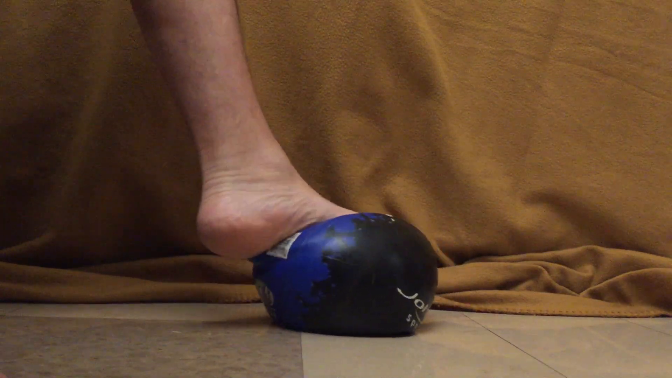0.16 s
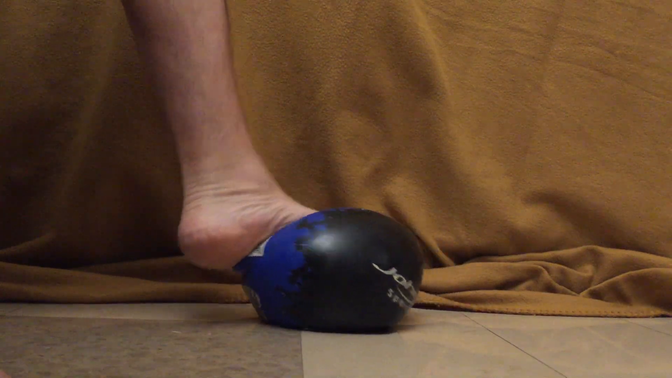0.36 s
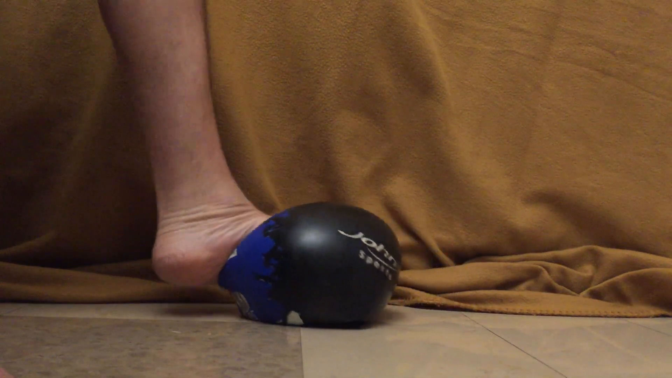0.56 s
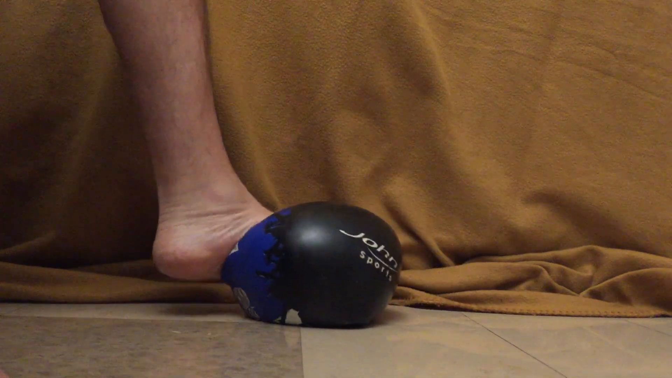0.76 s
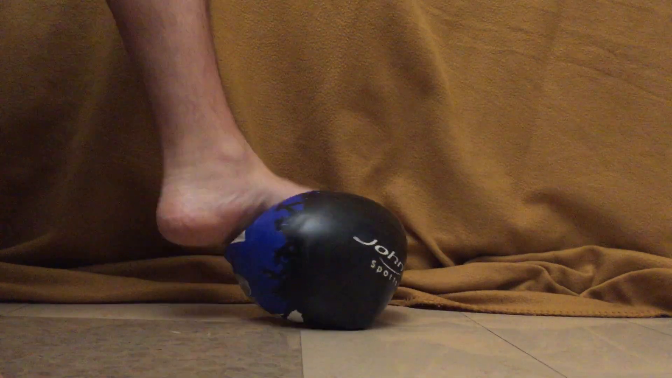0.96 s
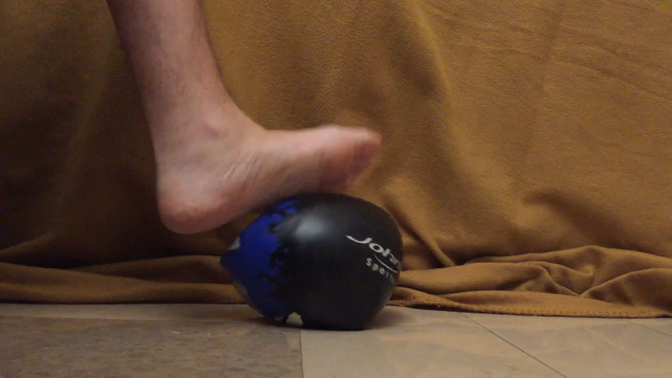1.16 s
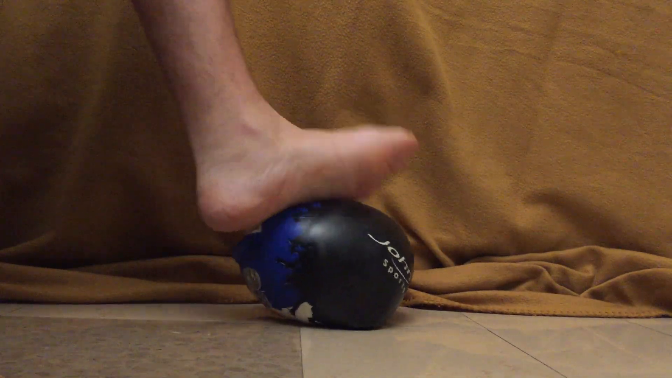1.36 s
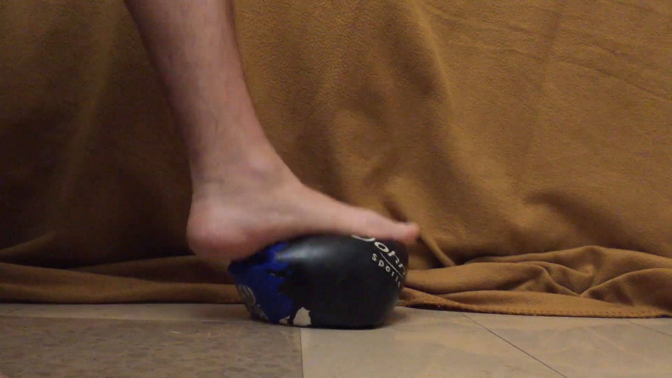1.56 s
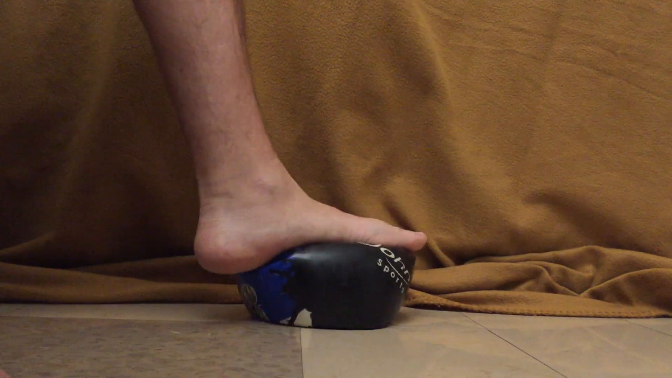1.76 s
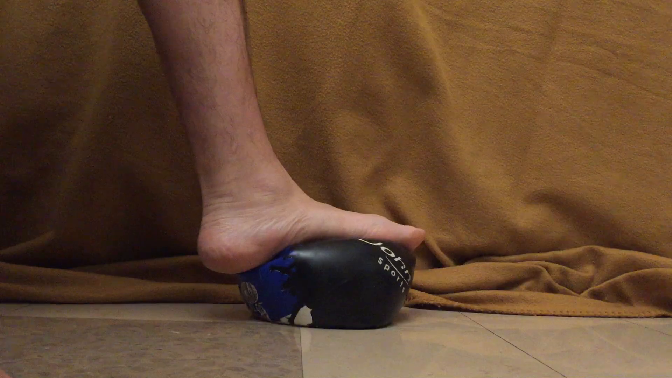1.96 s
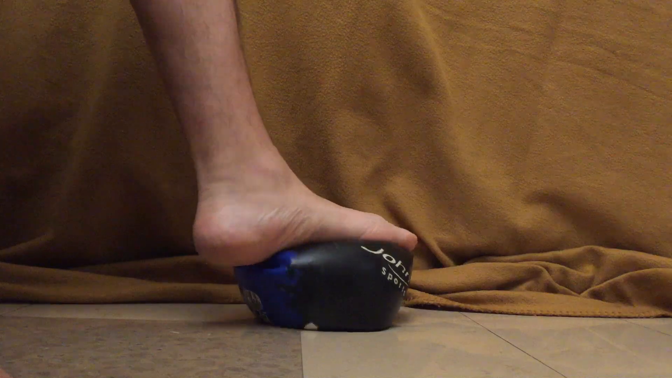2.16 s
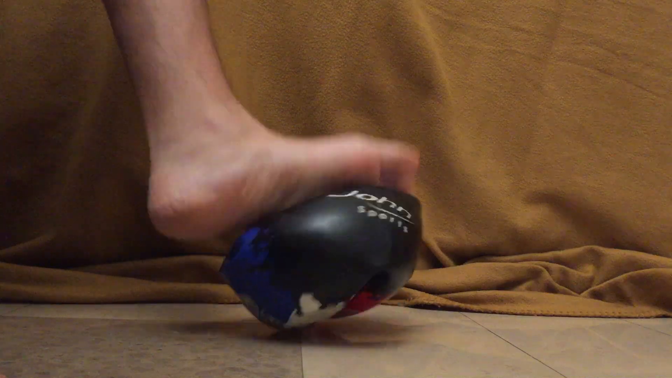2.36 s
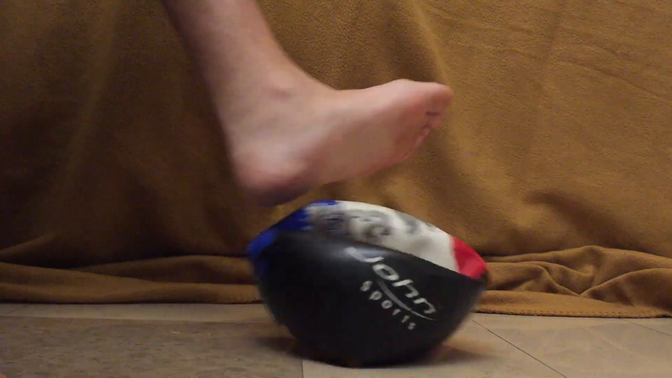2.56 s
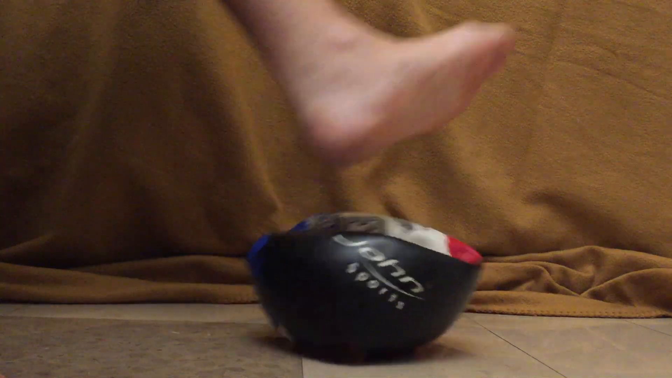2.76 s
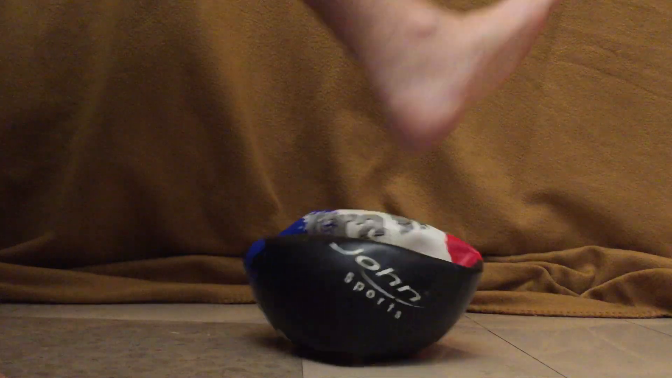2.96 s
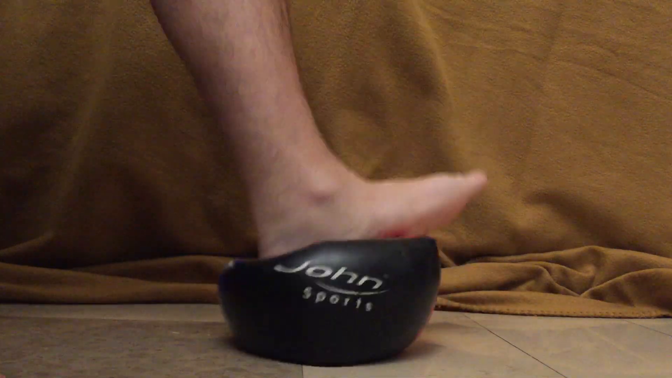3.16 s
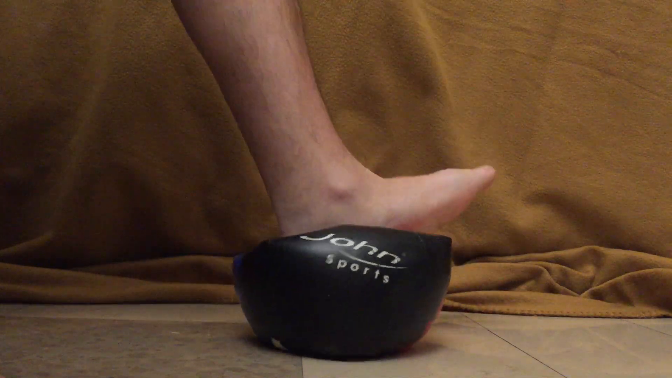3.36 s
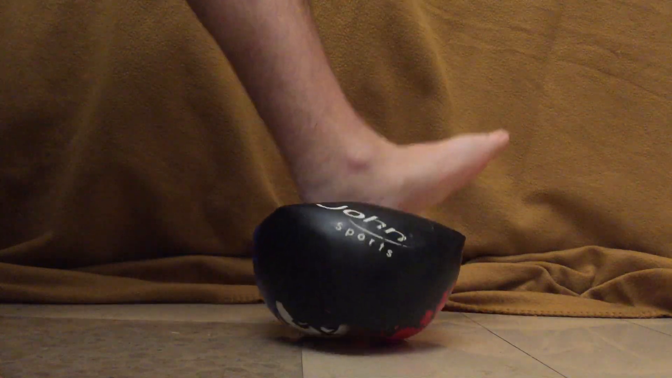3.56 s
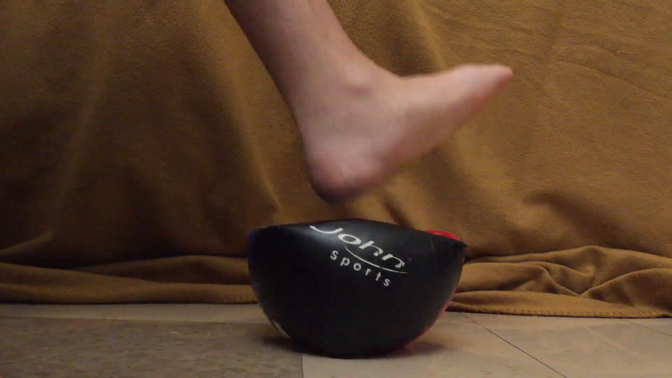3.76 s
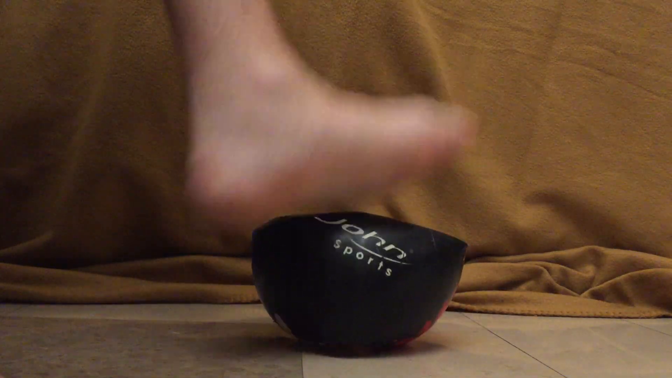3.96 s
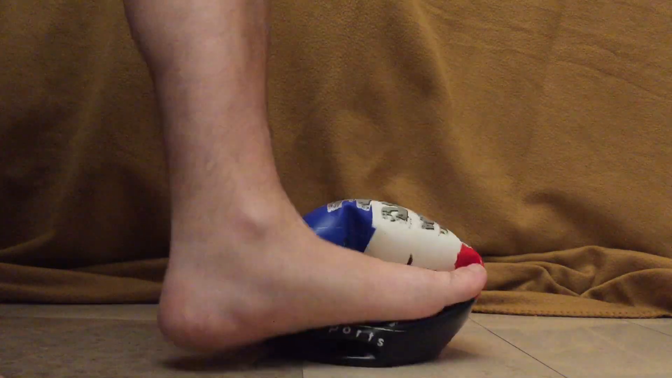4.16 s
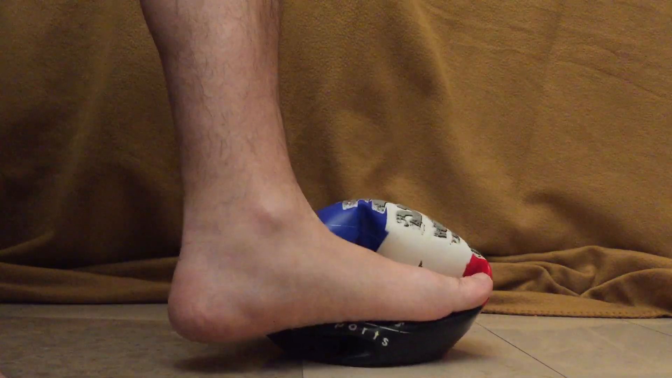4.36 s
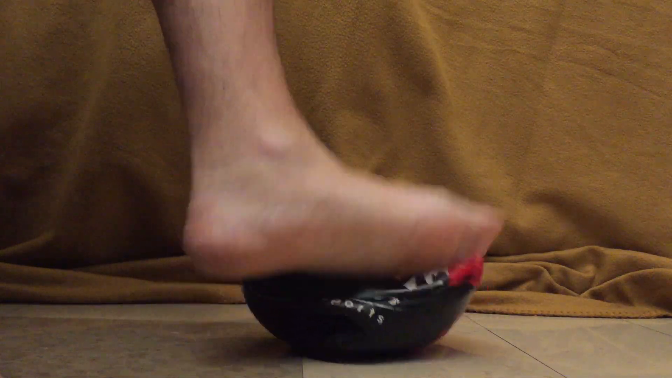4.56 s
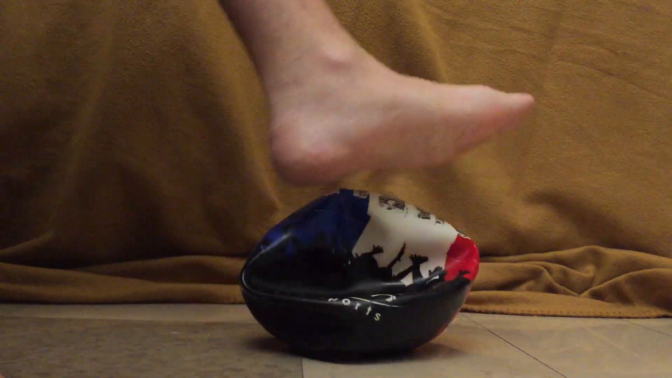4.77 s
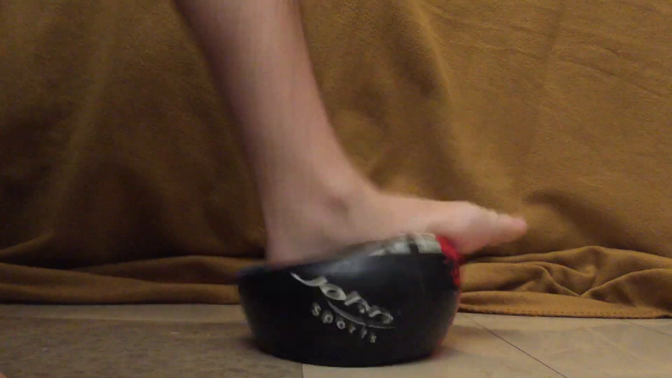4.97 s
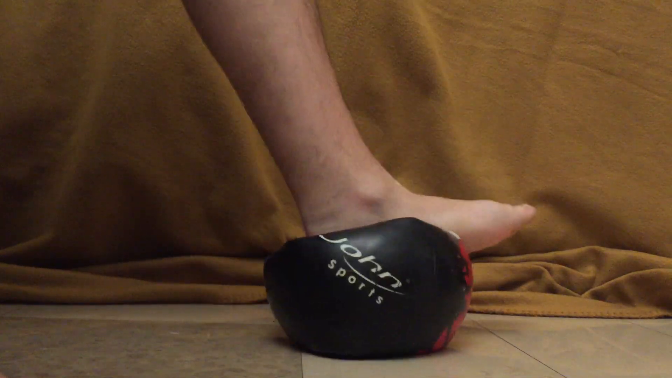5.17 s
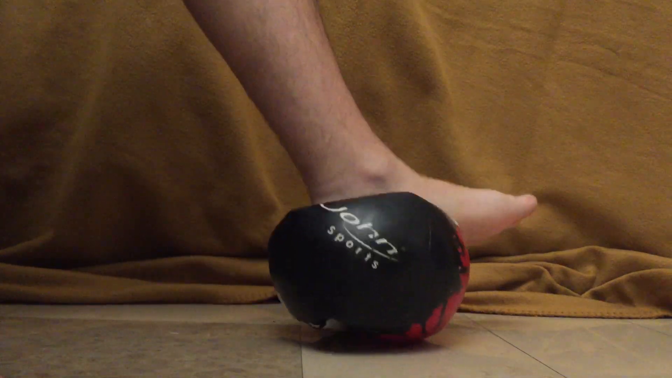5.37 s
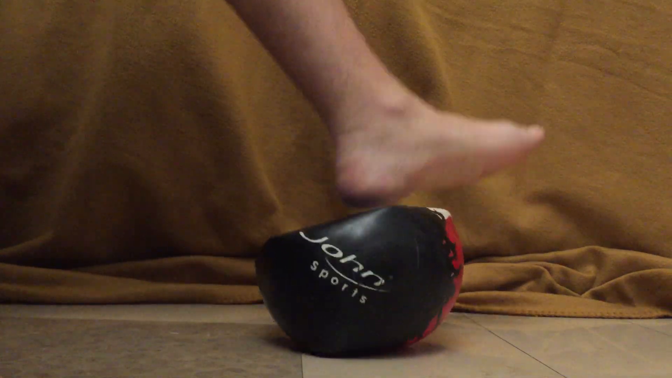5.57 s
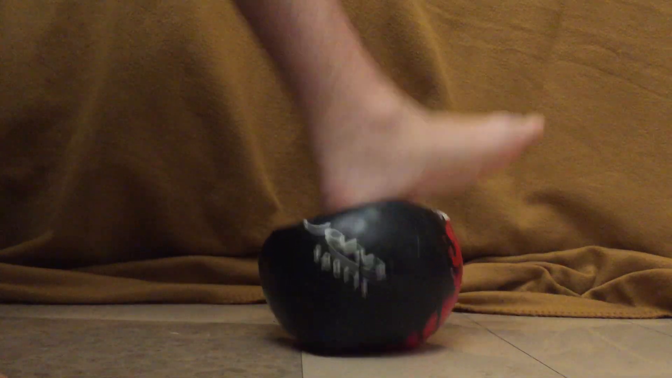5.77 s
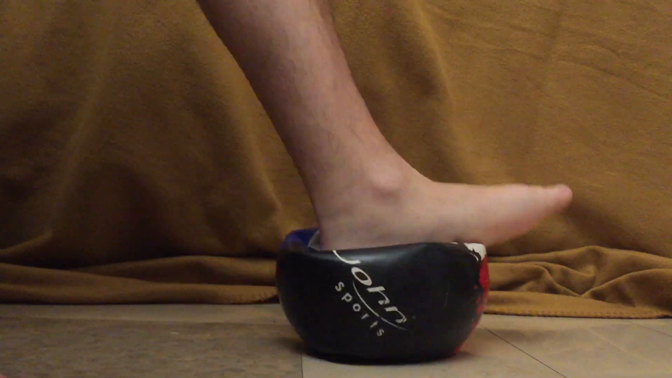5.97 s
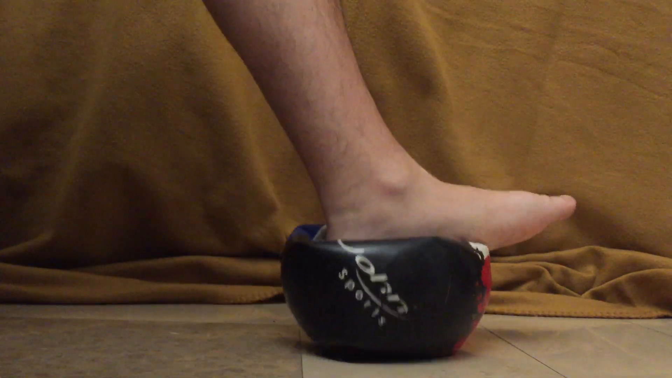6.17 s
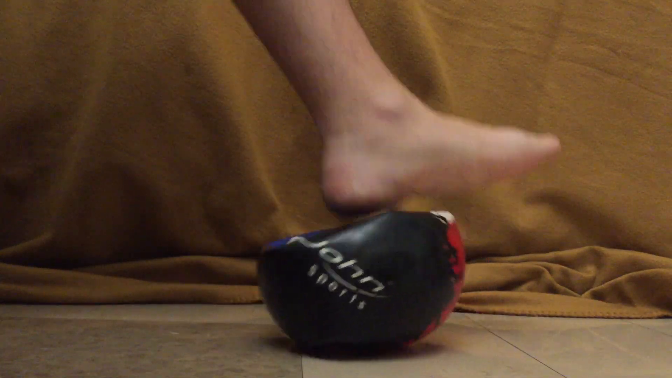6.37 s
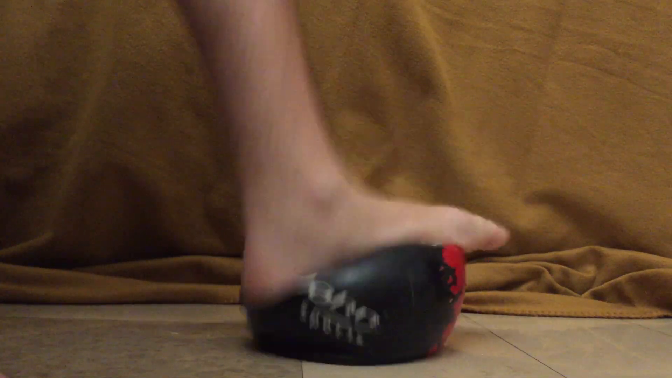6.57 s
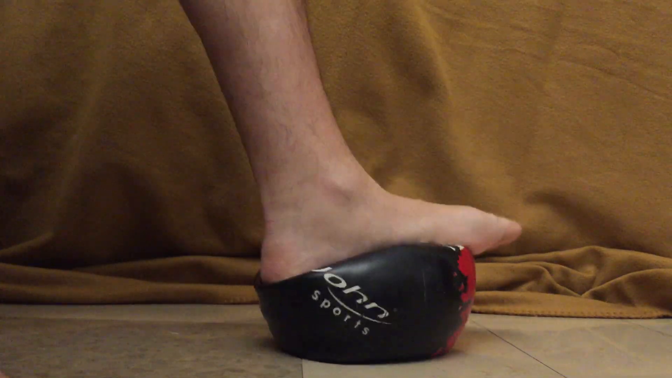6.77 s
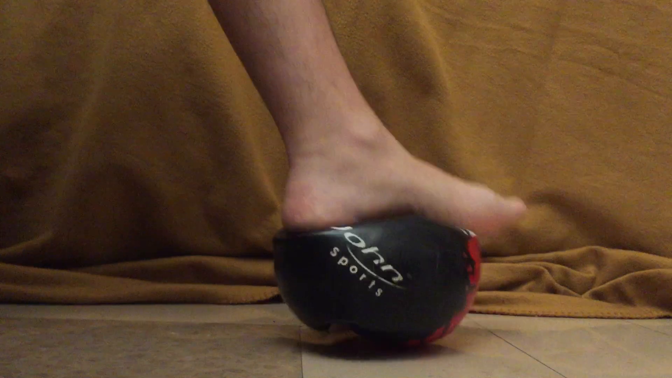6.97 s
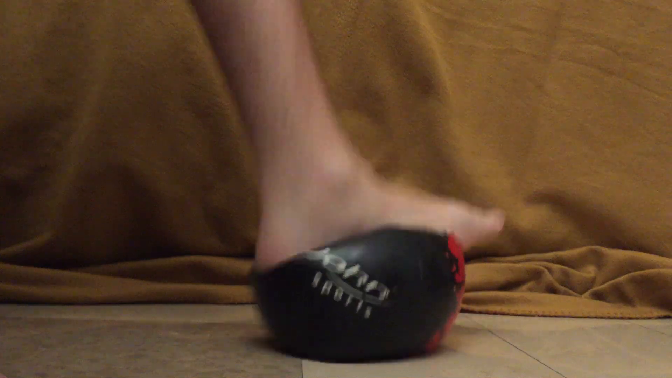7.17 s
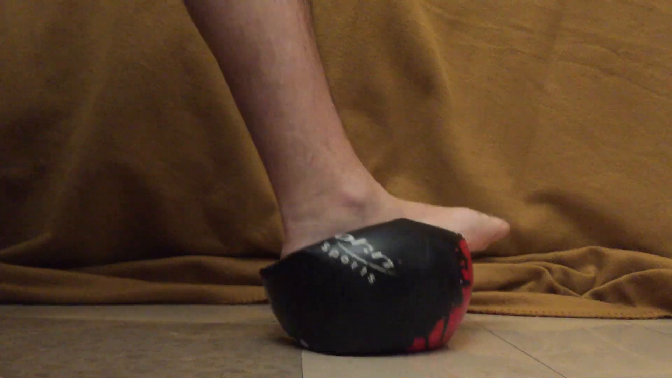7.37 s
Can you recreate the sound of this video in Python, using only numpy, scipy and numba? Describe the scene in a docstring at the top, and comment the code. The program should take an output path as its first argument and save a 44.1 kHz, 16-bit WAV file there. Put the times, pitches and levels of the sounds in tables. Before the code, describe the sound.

Close up in a small, faintly humming room, a bare foot presses a half-empty plastic ball on tiles. Faint rubbing and tiny ticks come first, then a muffled burst of low thumps. Louder hollow knocks and a clattering crumple follow, then a sudden, dominating double crack with a pop and a puff of air. Afterwards come short rustling strokes and moderate buckling clicks.

```python
"""Cracks, knocks and thumps of a soft, half-empty plastic ball squashed by a bare foot on tiles, close by.
Each shell buckle is a filtered noise tick plus damped modes of the snapping patch and of the whole wall.
One large dent pops through as a pressure pulse; deep thuds are low damped modes with a noise rumble.
Skin slides and hisses as coloured noise; air rushes from folds as noise bands with sinking centres.
A small humming room answers: echoes, a noise-built reverberation, low rumble and wavering hum tones."""
import sys
import numpy as np
from scipy import signal
from scipy.fft import rfft, irfft, next_fast_len
from scipy.io import wavfile
from scipy.ndimage import uniform_filter1d
from numba import njit

SR = 44100
rng = np.random.default_rng(int(sys.argv[2]) if len(sys.argv) > 2 else 0)


def store_wav(level_fs):
    """Save 16-bit WAV to argv[1]."""
    pcm = np.round(np.clip(np.atleast_2d(level_fs), -1, 1) * 32767)
    wavfile.write(sys.argv[1], SR, pcm.T.astype(np.int16))


N = 326781
TIME = np.arange(N) / SR

# clear shell buckles: start_s, thump_db, thump_hz, knock_db, knock_hz, crack_db, crumple_length_s
BUCKLES = [(0.06, -38, 293, -43, 1330, -55, 0), (0.067, -39, 324, -32, 1150, -46, .01),
           (0.56, -43, 286, -41, 1430, -62, .03), (0.6746, -33, 139, -33, 1270, -58.5, 0),
           (0.771, -35, 204, -38, 1520, -58, 0), (0.78, -27, 133, -38.5, 1630, -57, 0),
           (1.101, -35, 175, -52, 1030, -62, .02), (1.6438, -32, 179, -39, 1780, -58, 0),
           (1.688, -24.5, 190, -41, 1120, -60, 0), (1.718, -24.5, 108, -52, 1100, -50, 0),
           (1.736, -24, 108, -54, 1480, -51, .012), (1.771, -26.5, 159, -29, 1130, -60, 0),
           (1.779, -29.5, 185, -29, 930, -49, .045), (1.997, -36, 142, -40, 1380, -49, .024),
           (2.152, -50, 170, -44, 2200, -54, .01), (2.3952, -41, 149, -42, 1980, -49, 0),
           (2.445, -34, 185, -41, 1360, -66, .018), (2.5806, -38, 154, -37.5, 1730, -45.5, .012),
           (2.6618, -39, 182, -44, 1720, -57, 0), (2.7125, -59, 173, -40.5, 1420, -51, 0),
           (2.9112, -43, 180, -46, 1690, -56, 0), (3.1896, -36.5, 135, -31.5, 1170, -40, .02),
           (3.239, -19.5, 175, -22.5, 1480, -44, 0), (3.2545, -24, 360, -24, 620, -55, 0),
           (3.2555, -12, 152, -11, 1400, -29, 0), (3.306, -42, 179, -27.5, 1260, -39.5, .028),
           (3.4983, -23, 150, -28, 1190, -66, 0), (3.563, -29.5, 132, -31, 1220, -60, .02),
           (4.124, -27.5, 162, -27, 1200, -34.5, .014), (4.154, -21, 174.5, -23, 1594, -34, .018),
           (4.1885, -20, 234.7, -16.5, 1150, -46, .008), (4.1974, -12.5, 195.9, -8, 950, -57, 0),
           (4.211, -20.5, 226, -40, 1290, -30.5, 0), (4.219, -13.5, 109.4, -20, 1180, -42, 0),
           (4.2291, -17, 120.2, -21, 1500, -32, 0), (4.254, -33, 110.3, -24.5, 1370, -55, 0),
           (4.546, -39.5, 130, -37.5, 1600, -52.5, 0), (4.6011, -33.5, 156.6, -35.5, 1700, -52.5, .014),
           (4.6358, -34.5, 124, -32.5, 1900, -47.5, 0), (5.0839, -12.5, 158.4, 0.5, 1670, -25, 0),
           (5.1212, -5.5, 160.2, 3.5, 1400, -10.5, 0), (5.952, -38, 183, -47, 1403, -32, .008),
           (5.959, -18, 158, -36, 1400, -46, 0.0016), (5.9653, -21.5, 200, -18, 1170, -29, .008),
           (6.006, -22.5, 277, -42, 1400, -32, .012), (6.6729, -24, 124, -20.5, 1590, -32, .012),
           (6.699, -23, 172, -45, 1060, -51, 0), (6.743, -24, 181, -29.5, 1033, -36.5, .024),
           (6.993, -33.5, 201, -36, 1620, -51, 0), (7.1497, -43.5, 160, -43.5, 1440, -59, 0),
           (7.26, -48, 182, -32, 1120, -65, 0), (7.275, -42, 184, -32, 1430, -45.5, 0),
           (7.299, -27, 139, -24.5, 1350, -48, .012), (7.3144, -17, 135, -25.5, 1450, -39, .008),
           (7.3305, -27, 210, -27, 1690, -49, .02)]
# modes of the whole wall: multiple of thump_hz, level_db, t60_s
WALL_MODES = [(0.619, -9.5, 0.055), (1.002, 2, 0.037), (1.502, -13, 0.039), (2.3, -12, .022),
              (3.601, -9.5, 0.0086), (4.6, -19.5, 0.019)]
# modes of the snapping patch: multiple of knock_hz, level_db, t60_s
PATCH_MODES = [(.45, -10.5, 0.011), (0.838, -11, 0.013), (1.029, -1, 0.012), (1.201, -19, 0.022),
               (1.7, -15.5, .008), (2.5, -14.5, 0.0087)]
# weaker snaps that follow a buckle
CRUMPLE_GAP_S, CRUMPLE_DB, CRUMPLE_FADE_DB_PER_S = .006, -4.5, 125
# small creases under the sole: rate at a full push; ten times rarer per CREASE_THINNING_DB drop in rub
CREASES_PER_S, FULL_PUSH_DB, CREASE_THINNING_DB = 45, -45, 29
# crease levels relative to the rub level; median pitches, pitch spread as a log ratio
CREASE_THUMP_DB, CREASE_KNOCK_DB, CREASE_CRACK_DB, CREASE_SPREAD_DB = 12, 6, -5, 2.5
CREASE_THUMP_HZ, CREASE_KNOCK_HZ, CREASE_PITCH_SPREAD = 178.3, 1402, .2
THUMP_LAG_S = .0005  # the wall starts to move just after the patch flips
# large dent popping through, one row: start_s, level_db, pulse_time_constant_s
POP = (5.1215, 6.6, 0.00027)
# foot or ball landing on the floor, and the low wall boom of the big pop: start_s, level_db, pitch_hz, t60_s
THUDS = [(4.224, -24, 69, 0.19), (4.239, -29.5, 96, 0.38), (5.1223, -13, 99.8, 0.055),
         (6.741, -31, 89.2, 0.14)]
# hollow ball and the air inside: pitch_hz, width_hz, level_db
CAVITY_MODES = [(100, 14, -6), (195, 22, -10), (586, 45, -1), (1700, 350, -9)]
# sole strokes, levels before the trims in sliding():
# start_s, swell_s, hold_s, fade_s, rub_db, hiss_db, hiss_centre_hz
STROKES = [(0, 0.0043, .14, 0.19, -65.5, -59, 10000), (0.24, 0.32, .22, 0.2, -59.5, -67, 10600),
           (0.843, 0.098, 0.58, 0.23, -70, -86, 9910), (1.57, .2, 0.058, 0.11, -53.5, -66, 11850),
           (1.71, 0.25, .2, .36, -61, -62, 11520), (1.96, .035, .025, .06, -54, -78, 11600),
           (2.22, .17, .01, 0.17, -60, -76, 9900), (2.4, .035, .015, .05, -56, -88, 10000),
           (2.55, 0.016, .12, 0.19, -58, -86.5, 9500), (3.165, 0.076, 0.064, 0.091, -48.5, -58.5, 10250),
           (3.395, 0.089, 0.076, 0.21, -60, -73.5, 11240), (4.108, 0.032, 0.091, 0.17, -45, -61, 9800),
           (4.278, .16, .1, 0.28, -63.5, -75, 11900), (5.01, 0.051, 0.065, .12, -51, -72.5, 10000),
           (5.392, 0.043, .02, 0.11, -84.5, -72, 9940), (5.884, 0.091, 0.032, 0.12, -42.5, -53.5, 10000),
           (6.108, .08, 0.032, .15, -69, -67, 12060), (6.663, 0.017, 0.093, 0.15, -47, -58.5, 10000),
           (6.85, 0.077, 0.022, .12, -66.5, -71, 11230), (7.005, 0.052, .02, 0.053, -59.5, -65.5, 9700),
           (7.253, 0.048, 0.062, .16, -48, -56.5, 10200)]
SWELL_DB = 23.5  # rise over swell_s, equal fall over fade_s
# the hiss climbs as the skin tightens on the shell: total rise, tanh time constant
HISS_RISE_HZ, HISS_RISE_S = 1611, .07
REST_RUB_DB, REST_HISS_DB, REST_HISS_HZ = -79, -85.5, 9900  # foot barely moving, before the same trims
# rub spectrum: freq_hz, level_db
RUB_SPECTRUM = [(60, -10), (150, 5.5), (300, 2.5), (600, 1.5), (1000, 8), (1600, 4), (2500, 1),
                (4200, -1.5), (5000, -8), (5900, -3.5), (7200, -14), (15000, -29)]
# narrow gap between sole and shell, colouring the hiss: freq_hz, level_db
GAP_SPECTRUM = [(2800, -1), (4000, 9.5), (4900, -3), (5750, 9.5), (6700, -3), (8000, -2.5), (9400, 2),
                (10400, -4.5), (11300, -1), (12600, 1.5), (13500, -4), (15500, -6)]
# air squeezed through folds: start_s, level_db, start_centre_hz, width_hz (before scaling), t60_s
RUSHES = [(1.644, -44.5, 1820, 245, 0.095), (3.261, -50, 1770, 396, 0.65), (4.229, -46, 2830, 550, 0.42),
          (5.095, -33.5, 1760, 451, 0.099), (5.124, -31.5, 3600, 3600, 0.3), (5.13, -36, 2463, 1200, 0.65)]
# first reflections, tiles and nearest walls: delay_s, level_db
ECHOES = [(.0009, -15.5), (0.015, -17), (0.0342, -25.5)]
# room response: band_hz, level_db, t60_s
ROOM_BANDS = [(59.4, -6.5, 0.51), (130, -8.5, 0.4), (250, -7, 0.56), (500, -12, 0.66), (977, -19.5, 0.81),
              (2038, -13.5, 0.71), (4000, -9, 0.66), (5800, -12, .62), (8000, -13, 0.52), (14570, -16, .3)]
# indoor rumble spectrum: freq_hz, relative level_db
AIR_SPECTRUM = [(15, -50.5), (30, -24), (45, -12.5), (134, -3), (157, -8.5), (263, -9.5), (354, -22),
                (439, -16.5), (516, -29), (591, -22), (796, -29), (1400, -32), (16000, -56.5)]
# hum tones: pitch_hz, level_db (rms, before wavering)
HUM_TONES = [(129.2, -57.5), (274.5, -66.5), (592, -82.5)]
AIR_DB = -55  # rms, before wavering
TOP_HZ = 16000


def thump(t, hz, glide=1.84, glide_s=0.0011, swell_s=0.00066, slap_db=-19, slap_hz=520, slap_s=0.0049):
    """The whole wall wobbles; every dent has another shape, so its overtones lie a little differently."""
    wall = 0
    for multiple, db, t60_s in WALL_MODES:
        detune = 1 + 0.028 * multiple * rng.standard_normal()
        wall = wall + undb(db) * ring(t, hz * multiple * detune, t60_s, glide, glide_s)
    slap = noise_band(t, slap_hz, 410) * np.exp(-t / slap_s)
    return (undb(slap_db) * slap - wall) * (1 - np.exp(-t / swell_s))


def knock(t, hz, glide=1.57, glide_s=0.00029, snap_s=0.00071, flutter_db=-22, flutter_s=0.0064, reach=3.6):
    """A small patch flips, rings and flutters; soft plastic passes little far above its pitch."""
    patch = 0
    for multiple, db, t60_s in PATCH_MODES:
        detune = 1 + .02 * rng.standard_normal()
        patch = patch + undb(db) * ring(t, hz * multiple * detune, t60_s, glide, glide_s)
    flutter = noise_band(t, hz, 860) * np.exp(-t / flutter_s)
    snap = (patch + undb(flutter_db) * flutter) * (1 - np.exp(-t / snap_s))
    return lowpass(snap, reach * hz)


def crack(t, decay_s=0.0015, low_hz=2800, top_hz=9000):
    """The sharp tick of a crease giving way: a decaying noise burst."""
    burst = rng.standard_normal(len(t)) * np.exp(-t / decay_s)
    return lowpass(highpass(burst, low_hz), top_hz)


def buckles(rows):
    """Each buckle is a crack, a knock and a thump."""
    out = np.zeros(N)
    thump_t, knock_t = TIME[:SR // 14], TIME[:SR // 30]
    for start_s, thump_db, thump_hz, knock_db, knock_hz, crack_db, *_ in rows:
        add(out, min(start_s + THUMP_LAG_S, TIME[-1]), undb(thump_db) * thump(thump_t, thump_hz))
        snap = undb(knock_db) * knock(knock_t, knock_hz) + undb(crack_db) * crack(knock_t)
        add(out, start_s, snap)
    return out


def crumples():
    """A buckle may run on along its fold as a few weaker snaps, in the columns of BUCKLES."""
    rows = []
    for start_s, thump_db, thump_hz, knock_db, knock_hz, crack_db, length_s in BUCKLES:
        for k, (place, *chance) in enumerate(rng.uniform(-1, 1, size=(12, 5))):
            age_s = (k + 1 + .7 * place) * CRUMPLE_GAP_S
            if age_s < length_s:
                fall_db = CRUMPLE_DB - CRUMPLE_FADE_DB_PER_S * age_s
                low_db, high_db = fall_db + CREASE_SPREAD_DB * np.array(chance[:2])
                wall_ratio, patch_ratio = np.exp(CREASE_PITCH_SPREAD * np.array(chance[2:]))
                rows.append((start_s + age_s, thump_db + low_db, thump_hz * wall_ratio,
                             knock_db + high_db, knock_hz * patch_ratio, crack_db + high_db))
    return rows


def creases(rub_level_db):
    """Small random buckles, BUCKLES columns: the harder the sole rubs, the more and the louder."""
    count = int(CREASES_PER_S * TIME[-1])
    rows = []
    for k, (place, luck, *chance) in enumerate(rng.random((1000, 7))[:count]):
        start_s = (k + place) / CREASES_PER_S
        push_db = rub_level_db[int(start_s * SR)]
        if luck < 10 ** ((push_db - FULL_PUSH_DB) / CREASE_THINNING_DB):
            scatter = np.sqrt(3) * (2 * np.array(chance) - 1)  # uniform, spread 1
            thump_db, knock_db, crack_db = push_db + CREASE_SPREAD_DB * scatter[:3]
            wall_ratio, patch_ratio = np.exp(CREASE_PITCH_SPREAD * scatter[3:])
            rows.append((start_s, thump_db + CREASE_THUMP_DB, CREASE_THUMP_HZ * wall_ratio,
                         knock_db + CREASE_KNOCK_DB, CREASE_KNOCK_HZ * patch_ratio,
                         crack_db + CREASE_CRACK_DB))
    return rows


def pop(top_hz=5400):
    """The large dent turns inside out: a steep pressure front, then a longer suction."""
    out = np.zeros(N)
    start_s, db, length_s = POP
    age = TIME[:SR // 100] / length_s
    add(out, start_s, undb(db) * lowpass((1 - age) * np.exp(-age), top_hz))
    return out


def deep_thuds(rise_s=0.00067, rumble_db=-6, rumble_width_hz=70):
    """Foot or ball landing on the floor, and the pop's low wall boom: a mode and a rumble of twice its t60."""
    out, t = np.zeros(N), TIME[:SR // 2]
    for start_s, db, hz, t60_s in THUDS:
        rumble = undb(rumble_db) * noise_band(t, hz, rumble_width_hz) * decay(t, 2 * t60_s)
        add(out, start_s, undb(db) * (ring(t, hz, t60_s) + rumble) * (1 - np.exp(-t / rise_s)))
    return out


def footwork():
    """Rub dB, hiss dB and hiss centre Hz over time: every stroke swells, holds and dies away."""
    rub_power = np.full(N, undb(REST_RUB_DB) ** 2)
    hiss_power = np.full(N, undb(REST_HISS_DB) ** 2)
    weighted_hz = hiss_power * REST_HISS_HZ
    for start_s, swell_s, hold_s, fade_s, rub_db, hiss_db, hz in STROKES:
        age_s = TIME - start_s - swell_s  # zero at the end of the swell
        shape_db = SWELL_DB * (np.minimum(age_s, 0) / swell_s - np.maximum(age_s - hold_s, 0) / fade_s)
        power = undb(np.maximum(shape_db, -120)) ** 2
        skin_power = power * undb(hiss_db) ** 2
        rub_power = rub_power + power * undb(rub_db) ** 2
        hiss_power = hiss_power + skin_power
        weighted_hz = weighted_hz + skin_power * (hz + HISS_RISE_HZ * np.tanh(age_s / HISS_RISE_S) / 2)
    return 10 * np.log10(rub_power), 10 * np.log10(hiss_power), weighted_hz / hiss_power


def sliding(rub_level_db, hiss_level_db, centre_hz, slips_per_s=420, spread_db=3, rub_trim_db=-2.5,
            slip_weight=0.82, hiss_trim_db=-2, hiss_stage_width_hz=8400):
    """Tiny slips of the sole tick on the shell while dry skin hisses high above them."""
    ticks = (rng.random(N) < slips_per_s / SR) * rng.standard_normal(N)
    slips = ticks * undb(spread_db * np.minimum(rng.exponential(size=N), 3))
    grip_db = 2 * walk(45)
    rub = unit(colour(slip_weight * unit(slips) + rng.standard_normal(N), RUB_SPECTRUM))
    rub = rub * undb(rub_level_db + rub_trim_db + grip_db)
    centre_hz = np.clip(centre_hz, 6000, 15000)
    hiss = bandpass(rng.standard_normal(N), centre_hz, hiss_stage_width_hz)
    hiss = unit(bandpass(hiss, centre_hz, hiss_stage_width_hz))
    hiss = hiss * undb(hiss_level_db + hiss_trim_db + grip_db / 2)
    return rub + colour(hiss, GAP_SPECTRUM)


def rushes(rise_s=0.0086, sag_per_s=0.11, width_scale=0.81):
    """Air escapes between the folds: narrow or broad noise bands, centres sinking as pressure drops."""
    out, t = np.zeros(N), TIME[:SR * 3 // 4]
    for start_s, db, hz, width_hz, t60_s in RUSHES:
        centre_hz = hz * np.exp(-sag_per_s * t)
        air = bandpass(rng.standard_normal(len(t)), centre_hz, width_scale * width_hz)
        air = unit(bandpass(air, centre_hz, width_scale * width_hz))
        add(out, start_s, undb(db) * air * (1 - np.exp(-t / rise_s)) * decay(t, t60_s))
    return out


def room(build_s=0.0054, early_db=4, early_s=0.015):
    """Dense early reflections, then a noise tail with its own decay in each band."""
    t = TIME[:SR]
    hz, db, t60_s = np.transpose(ROOM_BANDS)
    log_f = np.log(np.maximum(np.fft.rfftfreq(SR, 1 / SR), 1))
    noise, response = rfft(rng.standard_normal(SR)), 0
    build = (1 + undb(early_db) * np.exp(-t / early_s)) * (1 - np.exp(-(t / build_s) ** 2))
    for share, band_db, band_t60_s in zip(np.eye(len(hz)), db, t60_s):
        fade = decay(t, band_t60_s) * build
        band = irfft(noise * np.interp(log_f, np.log(hz), share), SR)
        response = response + undb(band_db) * band * fade / np.linalg.norm(fade)
    return response


def background():
    """Low indoor rumble and hum tones wavering in level and phase."""
    out = unit(colour(rng.standard_normal(N), AIR_SPECTRUM)) * undb(AIR_DB + walk(3.8))
    for hz, db in HUM_TONES:
        level = np.sqrt(2) * undb(db + 2.1 * walk(13))
        out = out + level * np.sin(2 * np.pi * hz * TIME + .5 * walk(2.6))
    return out


def undb(db):
    """Decibels to gain."""
    return 10 ** (np.asarray(db) / 20)


def unit(x):
    """Scale to an rms of 1."""
    return x / np.sqrt(np.mean(x ** 2))


def add(track, start_s, sound):
    """Mix a sound into the track at a given time."""
    i = int(start_s * SR)
    track[i:i + len(sound)] += sound[:N - i]


def decay(t, t60_s):
    """Exponential fade by 60 dB in t60_s."""
    return np.exp(-np.log(1000) * t / t60_s)


def swept(t, glide, glide_s):
    """Bending-wave time: the fast ripples arrive first, so each ring starts high and falls."""
    return t + glide * glide_s * (1 - np.exp(-t / glide_s))


def ring(t, hz, t60_s, glide=0, glide_s=1):
    """One damped mode whose pitch may fall into place."""
    return np.sin(2 * np.pi * hz * swept(t, glide, glide_s)) * decay(t, t60_s)


def walk(rate_hz):
    """Smooth random wander, rms 1."""
    k = max(int(SR / rate_hz), 1)
    steps = np.repeat(rng.standard_normal(N // k + 1), k)
    return unit(uniform_filter1d(steps, k)[:N])


def colour(x, points):
    """Shape a signal with a spectrum of (freq_hz, level_db) points."""
    hz, db = np.transpose(points)
    size = next_fast_len(len(x), True)
    f = np.maximum(np.fft.rfftfreq(size, 1 / SR), 1)
    gain = undb(np.interp(np.log(f), np.log(hz), db))
    return irfft(rfft(x, size) * gain, size)[:len(x)]


def highpass(x, hz, order=2):
    """Butterworth high-pass."""
    return signal.sosfilt(signal.butter(order, hz, "high", fs=SR, output="sos"), x)


def lowpass(x, hz, order=2):
    """Butterworth low-pass."""
    return signal.sosfilt(signal.butter(order, min(hz, SR / 2 - 1), fs=SR, output="sos"), x)


def resonate(x, hz, width_hz):
    """One fixed resonance, gain 1 at its centre."""
    return signal.lfilter(*signal.iirpeak(hz, hz / width_hz, fs=SR), x)


def noise_band(t, hz, width_hz):
    """Noise through two equal resonances, each twice width_hz wide; rms 1."""
    noise = rng.standard_normal(len(t))
    return unit(resonate(resonate(noise, hz, 2 * width_hz), hz, 2 * width_hz))


@njit
def bandpass(x, hz, width_hz):
    """State-variable band-pass whose centre moves."""
    y, band, low = np.empty(len(x)), 0., 0.
    for i in range(len(x)):
        g, k = np.tan(np.pi * hz[i] / SR), width_hz / hz[i]
        v = (band + g * (x[i] - low)) / (1 + g * (g + k))
        band, low, y[i] = 2 * v - band, low + 2 * g * v, k * v
    return y


def delayed(x, delay_s):
    """The same sound a moment later."""
    return np.interp(TIME - delay_s, TIME, x, left=0)


def scene(pop_room_db=6, slide_room_db=-4):
    """The ball close by, and the room around it."""
    rub_level_db, hiss_level_db, hiss_centre_hz = footwork()
    bang = pop()
    slide = sliding(rub_level_db, hiss_level_db, hiss_centre_hz) + rushes()
    thuds, quiet, response = deep_thuds(), background(), room()
    hits = buckles(BUCKLES + crumples() + creases(rub_level_db)) + 1e-18  # offset avoids denormals
    cavity = sum(undb(db) * resonate(hits + bang, hz, width_hz) for hz, width_hz, db in CAVITY_MODES)
    ball = hits + thuds + cavity
    echoes = sum(undb(db) * delayed(ball, delay_s) for delay_s, db in ECHOES)
    # the big dent faces upward and sends most of its pulse into the room
    room_feed = ball + undb(pop_room_db) * bang + undb(slide_room_db) * slide
    wet = signal.fftconvolve(room_feed, response)[:N]
    return (highpass(ball + bang + slide + echoes + wet, 43, order=4) + quiet)[None]


def record(dry):
    """High-pass, soft ceiling that flattens the highest peaks, steep cut of the top."""
    ceiling = .69
    x = highpass(dry, 21, order=3) / ceiling
    x = ceiling * x / (1 + x ** 6) ** (1 / 6)
    return signal.sosfilt(signal.ellip(8, .2, 70, TOP_HZ, fs=SR, output="sos"), x)


dry = scene()
out = record(dry)
store_wav(out)
```